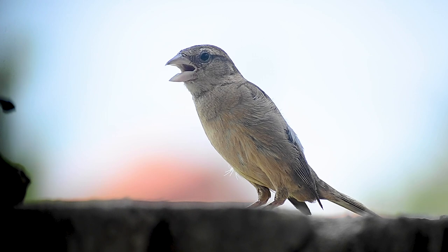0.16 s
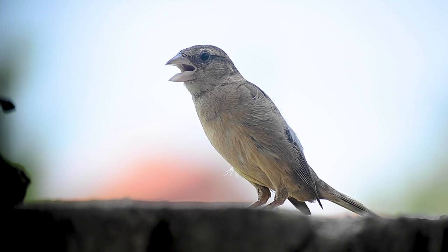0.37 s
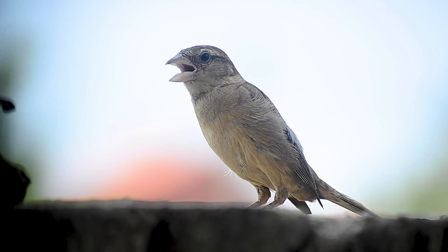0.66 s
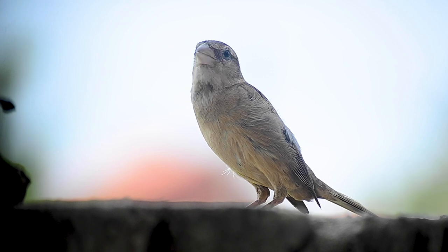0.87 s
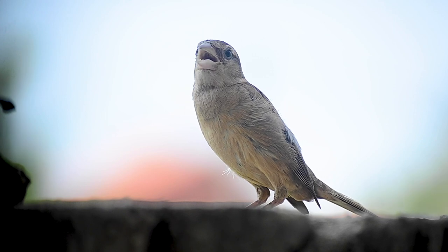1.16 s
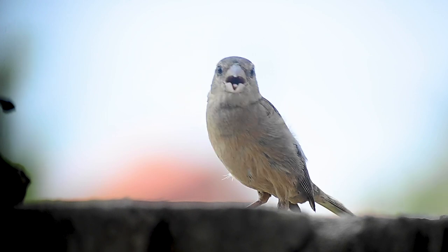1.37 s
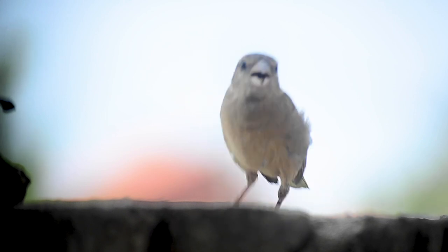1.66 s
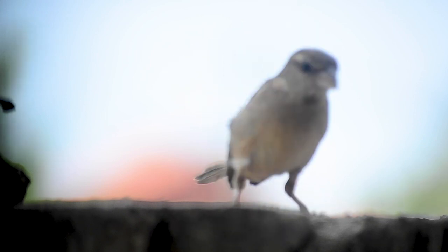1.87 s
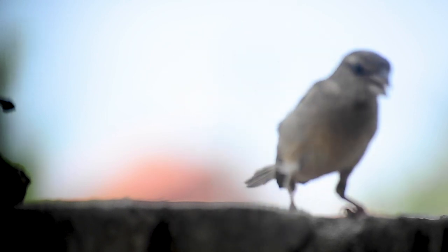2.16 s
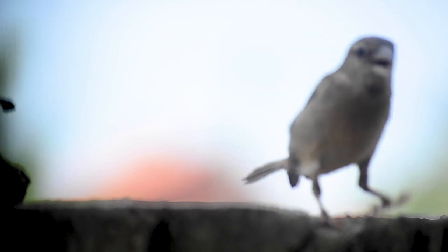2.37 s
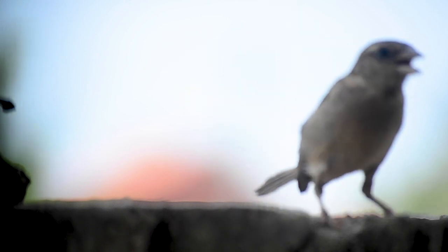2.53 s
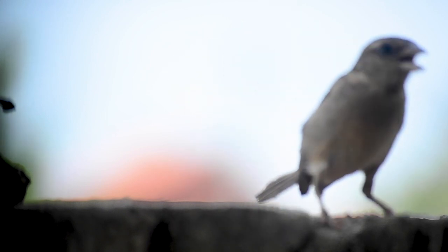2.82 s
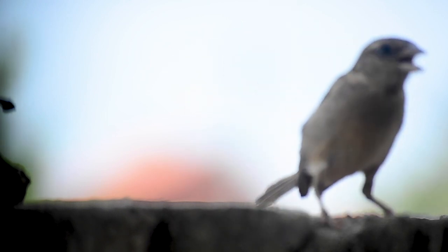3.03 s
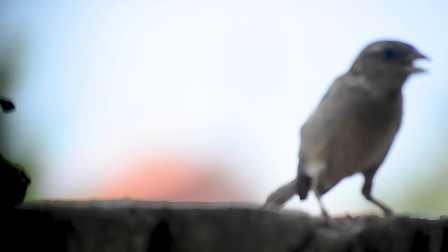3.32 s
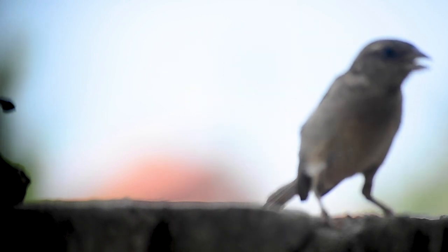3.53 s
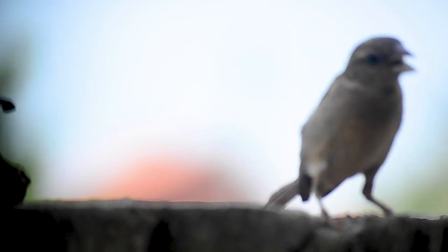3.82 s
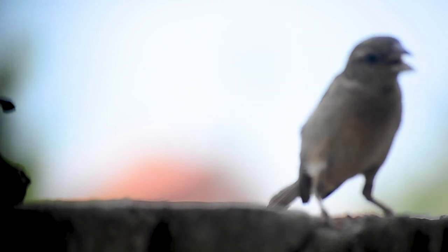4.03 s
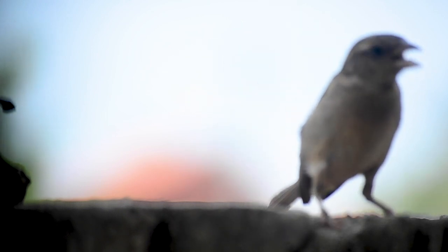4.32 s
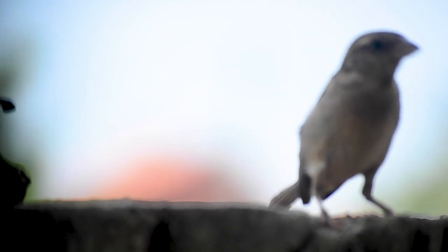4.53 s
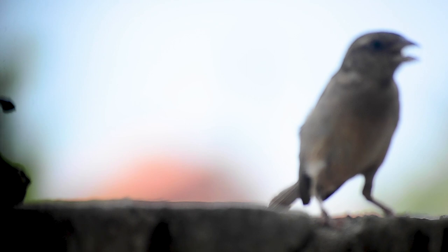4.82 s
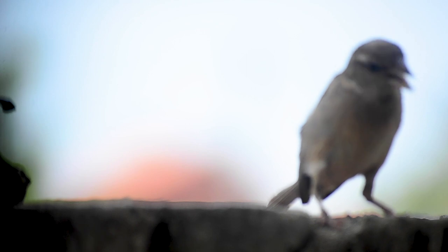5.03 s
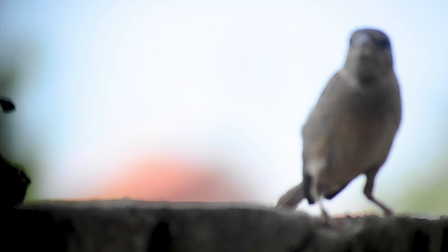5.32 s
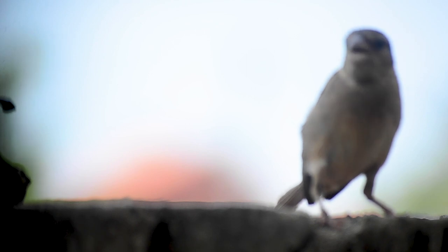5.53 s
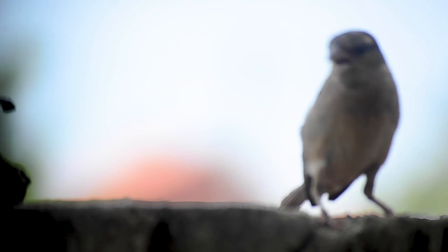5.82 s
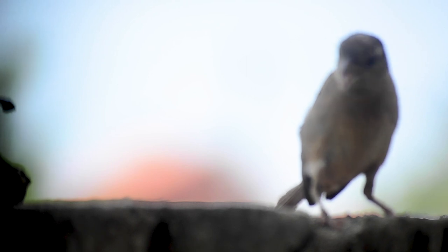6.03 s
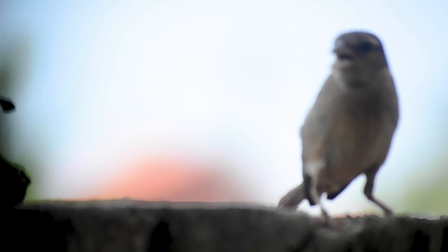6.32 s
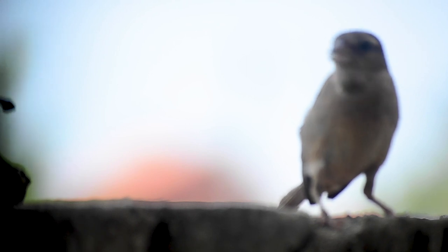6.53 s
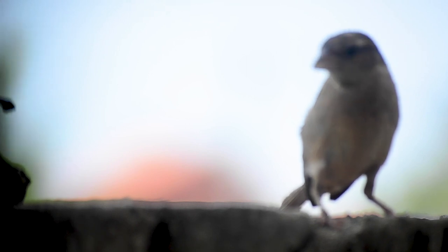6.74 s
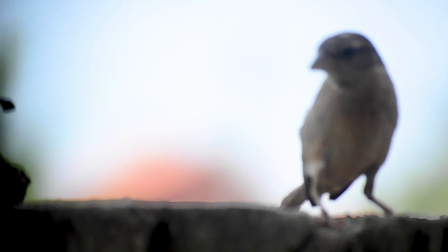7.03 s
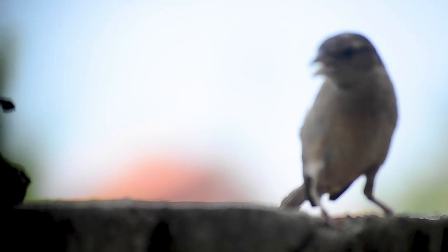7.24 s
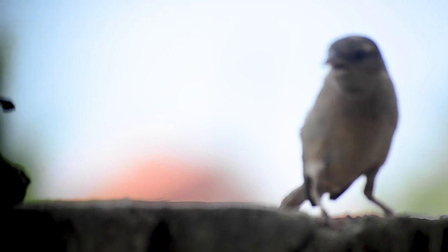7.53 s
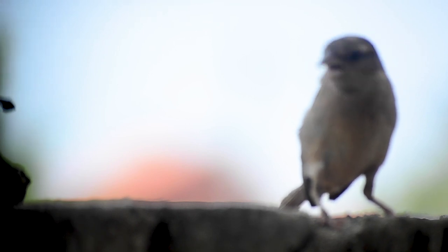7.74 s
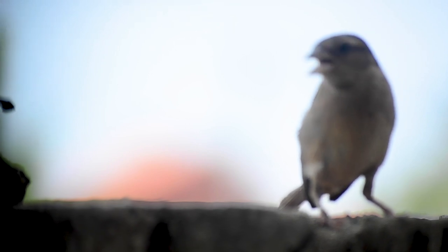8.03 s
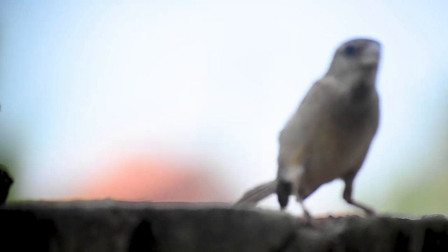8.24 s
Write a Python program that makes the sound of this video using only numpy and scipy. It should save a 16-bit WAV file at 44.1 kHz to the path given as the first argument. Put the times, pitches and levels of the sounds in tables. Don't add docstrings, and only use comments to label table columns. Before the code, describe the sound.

A sparrow close by gives short, buzzy, throbbing chirps, mostly in pairs, while a neighbour answers with falling calls over distant bird twitter and insect song.

```python
import sys
import numpy as np
from scipy import signal
from scipy.fft import rfft, irfft, next_fast_len
from scipy.io import wavfile
from scipy.ndimage import uniform_filter1d, map_coordinates

SR = 44100
rng = np.random.default_rng(int(sys.argv[2]) if len(sys.argv) > 2 else 0)


def how_loud(loudness_db):
    steps = np.asarray(loudness_db, float) / 20
    return 10 ** steps


def store_wav(level_fs):
    pcm = np.round(np.clip(np.atleast_2d(level_fs), -1, 1) * 32767)
    wavfile.write(sys.argv[1], SR, pcm.T.astype(np.int16))


N = 369558


def unit(x):
    return x / np.sqrt(np.mean(x ** 2) + 1e-20)


def along(points, hz):
    f, v = np.transpose(points)
    return np.interp(np.log(np.abs(hz) + 1), np.log(f + 1), v)


def wobble(rate, size=N):
    knots = rng.standard_normal(int(size * rate / SR) + 4)
    return map_coordinates(knots, [np.arange(size) * rate / SR])


def filtered(x, response):
    m = next_fast_len(N + SR // 2)
    return irfft(rfft(x, m) * response(np.fft.rfftfreq(m, 1 / SR)), m)[..., :N]


def add(track, s, x):
    i = round(s * SR)
    part = x[max(-i, 0):max(N - i, 0)]
    track[max(i, 0):][:len(part)] += part


def mono_noise(gain):
    return unit(filtered(rng.standard_normal(N), gain))


def rush(gain, patchy_db):
    # columns f/Hz, correlation [0-1]
    alike = [(25, .995), (60, 0.86), (200, 0.81), (1000, 0.66), (4000, 0.88), (8000, 0.73), (14000, .45)]
    z = signal.stft(rng.standard_normal((2, N)), nperseg=512)[2]
    field = uniform_filter1d(rng.standard_normal(z.shape[1:]), size=5, axis=0)
    field = uniform_filter1d(field, size=8, axis=1)
    pair = signal.istft(z * how_loud(patchy_db * unit(field)), nperseg=512)[1][:, :N]

    def mid_side_gain(hz):
        angle = np.arccos(np.clip(along(alike, hz), -1, 1)) / 2
        return gain(hz) * np.array([np.cos(angle), np.sin(angle)])

    mid, side = filtered(pair, mid_side_gain)
    return unit(np.array([mid + side, mid - side]))


def bursts(table, onset):
    t = np.arange(N) / SR
    power = 0
    for s, db, fading in table:
        fall_db = np.where(t < s, onset * (s - t), fading * (t - s))
        power = power + how_loud(db - fall_db) ** 2
    return np.sqrt(power)


def town():
    # columns f/Hz, density level/dB per Hz
    hum = [(12, -25), (20, -3.5), (101, -7.5), (141, -8), (226, -4.5), (466, -2.5), (599, -4), (689, -3.5),
           (1780, -5), (2100, 0), (2850, -10.5), (3570, -4), (5730, -18), (8230, -17), (15600, -24.5)]
    return how_loud(-54.85) * rush(lambda hz: how_loud(along(hum, hz)), patchy_db=1.0)


def electronics():
    # columns f/Hz, level/dB
    whine = [
        (48, -76),
        (14971, -90),
    ]
    t = np.arange(N) / SR
    tones = sum(how_loud(db) * np.sin(2 * np.pi * hz * t) for hz, db in whine)
    return how_loud(-1 + 1.5 * wobble(8)) * tones


def wind():
    # columns t/s, length/s, level/dB
    puffs = [(4.0, .08, -71), (4.274, 0.1, -63.5), (4.8, 0.053, -75), (6.1, 0.25, -66), (7.97, .06, -66),
             (8.142, 0.06, -59)]
    t = np.arange(N) / SR
    gusts = sum(how_loud(db) * np.exp(-((t - at) / (length / 2)) ** 2) for at, length, db in puffs)
    return gusts * mono_noise(lambda hz: 1 / (1 + (hz / 120) ** 3))


def insects():
    # columns f/Hz, width/Hz, level/dB
    low_modes = [(2065, 18, 0)]
    high_modes = [(2243, 51, 2), (4360, 210, -10), (5200, 31, -7)]
    # columns t/s, level/dB
    drone = [
        (2.5, -90),
        (2.9, -64.5),
        (7.4, -59),
        (7.7, -73.5),
    ]
    # columns t/s, level/dB, fading [dB per s]
    phrases = [(0, -49.5, 50), (1.5, -62, 18), (3.55, -52.5, 17), (4.12, -51.5, 55), (4.35, -60, 6),
               (5.0, -61, 18), (5.6, -47, 28), (6.65, -51.5, 1), (7.78, -44.5, 87), (7.98, -53, 90)]

    def band(modes):
        return mono_noise(lambda f: sum(how_loud(db) / (1 + ((f - c) / w) ** 2) for c, w, db in modes))

    t = np.arange(N) / SR
    low = how_loud(np.interp(t, *np.transpose(drone))) * band(low_modes)
    hush_db = -16.5 * np.clip((t - 7.6) / 0.094, 0, 1)
    high = bursts(phrases, onset=170) * how_loud(hush_db + 1.1 * wobble(25)) * band(high_modes)
    return low + high


def flock():
    # columns t/s, level/dB, fading [dB per s]
    flurries = [(0, -44.5, 120), (1.2, -51.5, 12), (1.4, -46.5, 89), (2.66, -52.5, 33), (3.58, -47.5, 13.4),
                (4.2, -50.5, 20), (5.0, -46.5, 14), (5.6, -46, 31), (6.7, -52, 21), (7.5, -49.5, 46),
                (8.38, -54, 20)]
    # columns f/Hz, density level/dB per Hz
    chatter = [(2200, -15.5), (2900, -1.5), (3600, -3), (4400, 5), (5200, -5.5), (6500, -15.5), (8000, -33)]
    rest_db = -67
    swell = np.hypot(bursts(flurries, onset=40), how_loud(rest_db))
    flutter = how_loud(-1.5 + 2.2 * wobble(14))
    return swell * flutter * rush(lambda hz: how_loud(along(chatter, hz)), patchy_db=2)


def background():
    return town() + insects() + flock() + wind() + electronics()


def whistle(hz, throb, rough):
    phase = 2 * np.pi * np.cumsum(hz) / SR + rough * wobble(595.1, size=len(hz))
    beat_hz = 330 + 90 * wobble(89.6, size=len(hz))
    turn = 2 * np.pi * np.cumsum(beat_hz) / SR + rng.uniform(0, 2 * np.pi)
    return phase, (1 + throb * np.sin(turn)) * how_loud(2.0 * rough * wobble(197, size=len(hz)))


def notes(table, throb, rough, under_db):
    out = np.zeros(N)
    for s, length, first_hz, last_hz, db in table:
        u = np.linspace(0, 1, round(length * SR))
        soft = np.abs(np.sin(np.pi * u)) ** 0.4
        phase, beat = whistle(first_hz + (last_hz - first_hz) * u, throb, rough)
        voice = np.sin(phase) + how_loud(-30) * np.sin(2 * phase) + how_loud(under_db) * np.sin(phase / 2)
        add(out, s, how_loud(db) * soft * unit(beat * voice))
    return out


def far_doves():
    # columns t/s, length/s, first f/Hz, last f/Hz, level/dB
    coos = [
        (1.03, .06, 870, 860, -62),
        (1.235, .055, 960, 1010, -58),
        (1.3, .05, 1000, 1000, -63),
        (6.9, .3, 535, 530, -67),
        (7.27, .17, 510, 500, -65),
        (7.54, .15, 485, 470, -65),
        (7.8, .15, 460, 450, -69),
        (7.22, .075, 3750, 2700, -56),
    ]
    return notes(coos, throb=0.05, rough=0.12, under_db=-40)


def far_birds():
    # columns t/s, length/s, first f/Hz, last f/Hz, level/dB
    twitter = [(.205, 0.032, 4500, 3890, -51), (.24, 0.04, 3820, 3200, -53), (.725, 0.052, 4620, 5000, -53),
               (1.165, 0.029, 4000, 5150, -38.5), (1.265, 0.056, 5560, 4280, -46),
               (1.28, 0.029, 4120, 3890, -42), (1.33, 0.039, 3820, 5070, -41),
               (1.365, 0.016, 4610, 3580, -39.5), (1.425, 0.029, 3364, 4290, -39),
               (3.195, 0.022, 2940, 4180, -54.5), (3.48, 0.0263, 3490, 2930, -35),
               (4.97, 0.063, 5600, 4470, -46), (6.02, 0.057, 3970, 3380, -54),
               (6.665, 0.047, 3020, 4260, -39), (8.138, 0.046, 4240, 5590, -40)]
    # columns t/s, f/Hz, level/dB
    chips = [(.205, 2200, -49), (1.581, 3500, -45), (1.655, 4610, -48.5), (1.66, 3540, -48),
             (1.775, 3540, -45.5), (2.345, 4310, -48), (2.345, 3450, -46.5), (2.975, 3540, -49),
             (3.569, 4410, -44), (3.67, 3715, -46.5), (4.085, 3110, -49), (4.8, 3380, -41.5),
             (5.004, 3970, -40.5), (5.056, 3830, -36), (5.445, 2900, -46.5), (5.53, 5300, -40),
             (5.595, 3825, -41.5), (5.64, 4410, -42), (6.615, 3840, -36), (8.06, 2397, -50)]
    # columns t/s, level/dB
    leads = [(1.125, -60), (4.312, -50), (6.24, -57), (8.1, -58)]
    # length/s, first f/Hz, last f/Hz
    lead = (0.064, 6900, 5300)
    # columns t/s, level/dB
    ticks = [(7.694, -50), (7.791, -49.5), (7.861, -56), (7.959, -50.5), (8.028, -51)]
    # length/s, first f/Hz, last f/Hz
    tick = (.016, 4750, 4500)
    chip_s, chip_sag = 0.021, 0.032
    calls = list(twitter)
    calls += [(s, chip_s, hz, hz * (1 - chip_sag), db) for s, hz, db in chips]
    calls += [(s, *lead, db) for s, db in leads]
    run = [(s, *tick, db) for s, db in ticks]
    return notes(calls, throb=1.0, rough=0.85, under_db=-19.5) + notes(run, throb=0.6, rough=0.7, under_db=1)


def knocks():
    # columns t/s, peak level/dB, contact/s
    taps = [
        (1.871, -9, 0.00016),
        (5.069, -21, 0.00018),
    ]
    out, t = np.zeros(N), np.arange(SR // 100) / SR
    for s, db, contact in taps:
        u = t / contact
        add(out, s, how_loud(db) * u * (2 - u) * np.exp(-u))
    return out


def neighbour():
    # columns t/s from its start, strongest line f/Hz, its level/dB, other overtones/dB
    fall = [
        (-.022, 4310, -20, -28),
        (-.01, 4250, -7, -15),
        (-.002, 3720, -6, -11),
        (.005, 4350, 7.5, -28),
        (.02, 4150, 2.5, -21),
        (.04, 3390, 2, -23),
        (0.059, 2990, -8.5, -32),
        (0.078, 2700, -22, -55),
    ]
    # columns t/s, level/dB, pitch factor, length factor
    calls = [(-.06, -20.5, 1.2, 0.98), (1.197, -38, 1.09, 0.86), (1.938, -31.5, 1, 0.8),
             (2.511, -32.5, 1.01, 0.97), (4.354, -37, 1.09, 0.77), (4.859, -34.5, 0.99, 1.0),
             (5.507, -33, 0.98, 0.99), (6.288, -39, 1.094, 0.92), (6.769, -33.5, 0.99, 0.99),
             (7.411, -34.5, 0.99, 1)]
    out = np.zeros(N)
    s, hz, db, over_db = np.transpose(fall)
    for start, level_db, pitch, length in calls:
        t = np.arange(s[0], s[-1], 1 / SR / length)
        base = pitch * np.interp(t, s, hz) / 2
        phase, beat = whistle(base, throb=0.84, rough=0.67)
        others = how_loud(-12.0) * np.sin(phase)
        for k in range(3, 6):
            others = others + np.sin(k * phase) / (1 + ((k * base - 6500) / 600) ** 2)
        voice = how_loud(np.interp(t, s, db)) * np.sin(2 * phase) + how_loud(np.interp(t, s, over_db)) * others
        add(out, start + s[0] * length, how_loud(level_db) * beat * voice)
    return out


def sparrow():
    # columns t/s, length/s, lower voice at the crest f/Hz, fundamentals level/dB, crest place [0-1]
    chirps = [(0.759, 0.07, 1352, -25.5, 0.46), (0.88, 0.087, 1572, -23, 0.49),
              (1.842, 0.064, 1347, -25, 0.52), (1.991, 0.077, 1472, -22.5, .49),
              (3.323, 0.059, 1293, -27.5, 0.51), (3.416, 0.078, 1407, -26, .53),
              (4.467, 0.075, 1371, -26, 0.47), (5.073, 0.074, 1342, -25.5, .49),
              (5.257, 0.085, 1424, -24, .48), (6.457, 0.056, 1327, -25, 0.44),
              (6.547, 0.063, 1487, -24, 0.51), (8.17, 0.057, 1359, -23.5, 0.51),
              (8.257, 0.062, 1415, -24.5, .51)]
    # upper over lower at the start and at the end [share of the lower],
    # overtones level/dB, beak opening [dB per octave], squareness of the arch
    voices = [(.285, 0.15, -4, 14, 2.4), (0.25, 0.0915, -3, 6, 2.3), (.22, .225, 3.5, 4.5, 2.3),
              (.255, .13, -0.5, -6, 2.6), (.24, 0.135, -0.5, 6, 2.1), (.265, .15, 0, -17.5, 3),
              (0.23, .21, -0.5, -3.5, 2.1), (0.24, 0.0836, -2, -3, 2.6), (0.22, 0.2, 1, -8, 2.1),
              (0.27, 0.097, 2.5, 15, 1.9), (.195, .245, 2, -9.5, 2.2), (.205, 0.173, 1, 6.5, 2.2),
              (0.23, 0.14, -1.5, -18.5, 2.8)]
    # f/Hz, level/dB, sheen above it level/dB
    mouth = [(7200, 10, -8), (7300, 11, 7), (8000, 14, -3), (6560, 14, 19), (6700, 16.5, -3),
             (6670, 21, -3), (6600, 15, -1), (6730, 23, 7), (6540, 14.5, -3), (6160, 4, -21),
             (6600, 13, -4), (6470, 8, 9), (6600, 23.5, -3)]
    ends_hz = [770, 783, 793, 692, 807, 1010, 727, 793, 743, 815, 810, 820, 890]
    sum_tones = [
        [-10, 4, 3.5, -19.5],
        [-3.5, 8, 1.5, -2.5, -15],
        [-5.5, 1, 0, -0.5, 2, -5],
        [-34, -7.5, -9, -8.5, -11, -7.5, -19],
    ]
    # columns f/Hz, level/dB
    throat = [(1500, -18.5), (2400, -6.5), (3400, -5.5), (3900, 0.5), (4750, 4.5), (5500, -5),
              (6500, -12.5), (7600, -19.5), (9500, -27.5), (14000, -30), (16000, -51)]
    # overtones level/dB, tilt [dB per octave], share of the chirp's own opening
    beak = [
        (-1.5, 0, 0.11),
        (4.5, 15, 0.72),
        (5, 5, 0.81),
        (5, -4, 0.98),
        (3.5, -11, 1),
        (0, -9.5, 0.64),
        (2.5, -12, 0),
    ]
    foot_hz, slip = 797.1, 1.847
    rise_db, rise, fall_db, fall_off = 13, 3.36, 14.5, 2.93
    steeper = 1.1
    rough, hiss_db, fade_db = 0.16, -19, -2.5
    patchy_db = 2.5
    sheen_hz = 10600
    gap_hz, gap_width_hz, gap_depth = 9600, 450, 0.27

    high = [-14 + fade_db * (order - 5) - 8 * np.linspace(-1, 1, order + 3) ** 2 for order in range(5, 10)]
    rows = list(sum_tones) + high
    out = np.zeros(N)
    for chirp, voice, head, end_hz in zip(chirps, voices, mouth, ends_hz):
        s, length, top_hz, top_db, crest = chirp
        first, last, over_db, open_db, arch = voice
        mouth_hz, mouth_db, sheen_db = head
        t = np.arange(0, length, 1 / SR)
        u = t / length

        off = 2 * np.abs(u - crest)
        climb = (top_hz - foot_hz) * off ** arch
        descent = (top_hz - end_hz) * (off / 2 / (1 - crest)) ** (steeper * arch)
        low = top_hz - np.where(u < crest, climb, descent)
        gap = low * (first + (last - first) * u ** slip)
        level_db = top_db - np.where(u < crest, rise_db * off ** rise, fall_db * off ** fall_off)

        place = [u * (len(beak) - 1)]
        bright_db, tilt_db, share = [map_coordinates(c, place, mode="nearest") for c in np.transpose(beak)]
        bright_db = bright_db + share * over_db
        beak_db = tilt_db + share * open_db
        unsettled = np.exp(-t / 0.041)

        groups, power = np.zeros((2, len(t))), np.zeros((2, len(t)))
        for order, row in enumerate(rows, 1):
            uppers = order + 1 - np.arange(len(row))
            hz = order * low + uppers[:, None] * gap
            colour = along(throat, hz) + sheen_db / (1 + (sheen_hz / hz) ** 8)
            colour = colour + mouth_db / (1 + ((hz - mouth_hz) / 600) ** 2)
            colour = colour + beak_db * np.log2(np.clip(hz, 2800, 7000) / 4000)
            colour = colour + rng.normal(0, 0.68, (len(row), 1))
            patches = patchy_db * wobble(69.8, size=hz.size).reshape(hz.shape)
            gain = how_loud(np.array(row)[:, None] + (order > 1) * (colour + patches))
            shake = rough * (1 + 0.65 * unsettled) * np.sqrt(order - 0.8)
            shake = shake * wobble(450, size=hz.size).reshape(hz.shape)
            offset = rng.normal(0, 0.7, (len(row), 1)) + rng.uniform(0, 2 * np.pi)
            lines = gain * np.cos(2 * np.pi * np.cumsum(hz, axis=1) / SR + shake + offset)
            group = min(order - 1, 1)
            groups[group] += lines.sum(axis=0)
            power[group] += (gain ** 2 / 2).sum(axis=0)
        pair, overtones = groups / np.sqrt(power)

        throat_gain = how_loud(along(throat, np.fft.rfftfreq(len(t), 1 / SR)))
        air = unit(irfft(rfft(rng.standard_normal(len(t))) * throat_gain, len(t)))
        breath = how_loud(hiss_db + 15.4 * unsettled) * air
        edge = np.clip(np.minimum(t, length - t) / 0.0012, 0, 1)
        add(out, s, edge * how_loud(level_db) * (pair + how_loud(bright_db) * (overtones + breath)))

    def radiation(f):
        shade = 1 - gap_depth / (1 + ((f - gap_hz) / gap_width_hz) ** 2)
        return shade / (1 + (550 / (f + 1)) ** 6)

    return filtered(out, radiation)


def echoes(x, gap_s):
    # columns f/Hz, t60/s
    yard = [(800, 0.11), (3500, 0.41), (7000, 0.065), (12000, 0.16)]
    out, step = np.zeros((2, N + 2 * SR)), 2 * SR // 3
    for i in range(0, N, step):
        hz, t, z = signal.stft(rng.standard_normal((3, SR // 2)), SR, nperseg=256)
        decay = how_loud(-60 * t / along(yard, hz)[:, None])
        tail = signal.istft(z * decay, SR, nperseg=256)[1]
        tail = tail[0] + 0.056 * tail[1:]
        wet = signal.fftconvolve(x[None, i:i + step], tail / np.linalg.norm(tail[0]), axes=1)
        out[:, i + round(gap_s * SR):][:, :wet.shape[1]] += wet
    return out[:, :N]


def scene():
    near, second = sparrow(), neighbour()
    far, doves = far_birds(), far_doves()
    send = how_loud(-23.0) * near + how_loud(-6.5) * second + how_loud(-6.0) * far + how_loud(1) * doves
    wet = echoes(send, gap_s=0.004)
    return near + second + how_loud(0.5) * far + doves + knocks() + wet + background()


def roll_off(x):
    return signal.sosfilt(signal.butter(12, 15780, fs=SR, output="sos"), x)


def record(dry):
    # columns f/Hz, width/Hz, depth [0-1]
    notches = [
        (5684, 345, 0.7),
        (6850, 140, 0.73),
    ]
    lag_s = 2.1e-5

    def housing(f):
        cuts = [1 - d * 1j * f * w / (c * c - f * f + 1j * f * w) for c, w, d in notches]
        return np.prod(cuts, axis=0) * np.exp(-1j * np.pi * np.outer([1, -1], f) * lag_s)

    return roll_off(filtered(dry, housing))


dry = scene()
out = record(dry)
store_wav(out)
```